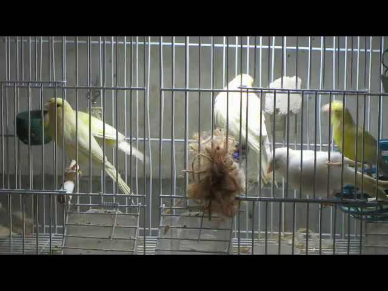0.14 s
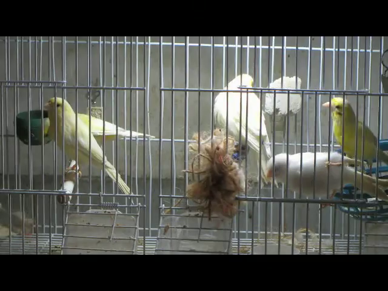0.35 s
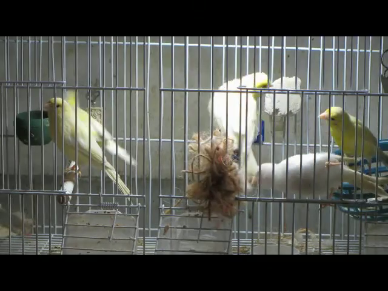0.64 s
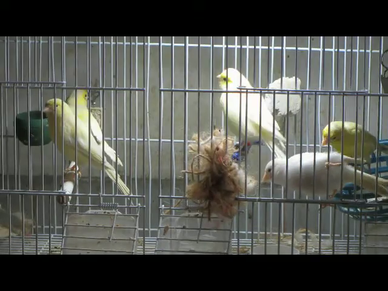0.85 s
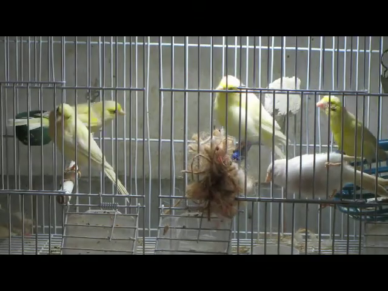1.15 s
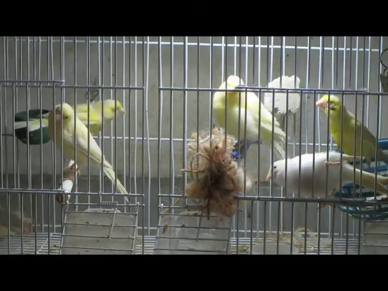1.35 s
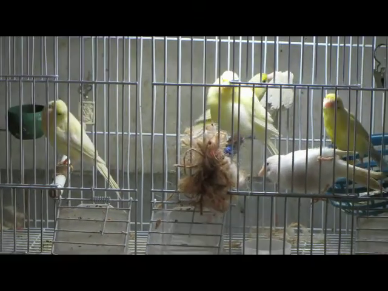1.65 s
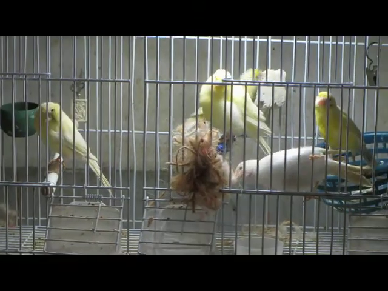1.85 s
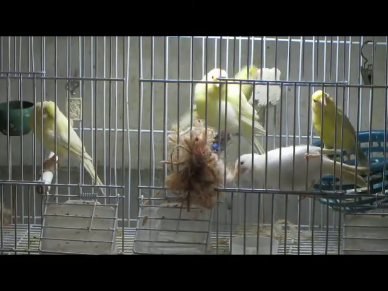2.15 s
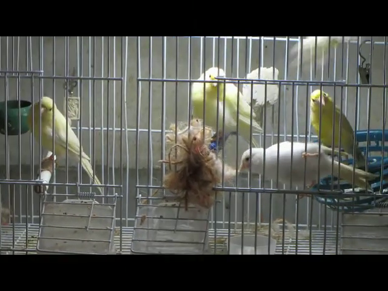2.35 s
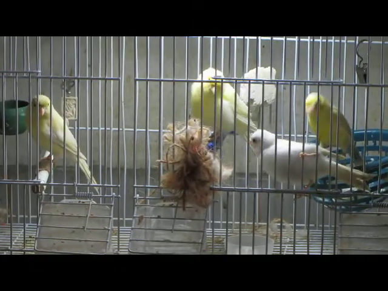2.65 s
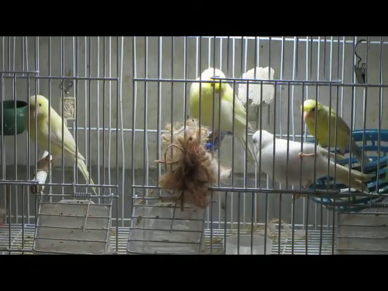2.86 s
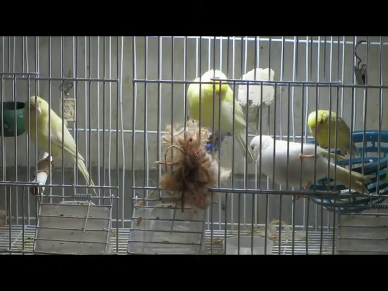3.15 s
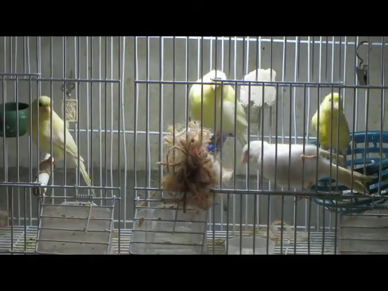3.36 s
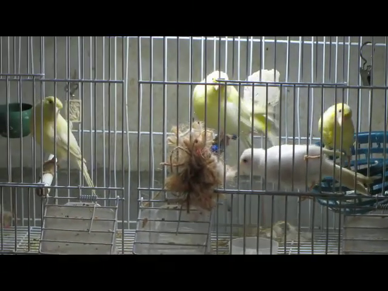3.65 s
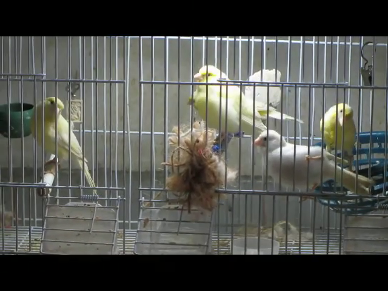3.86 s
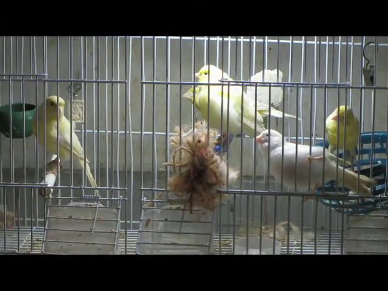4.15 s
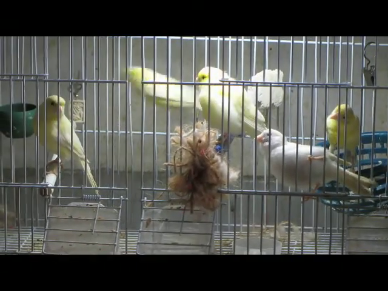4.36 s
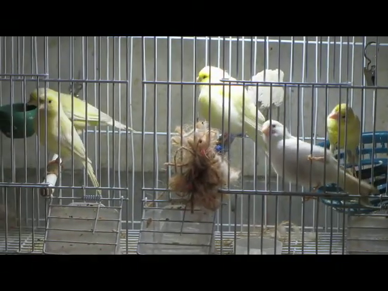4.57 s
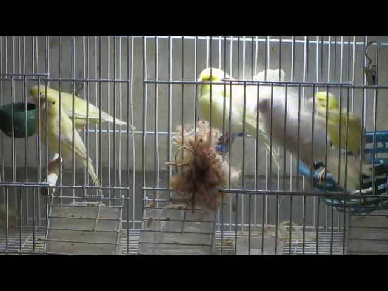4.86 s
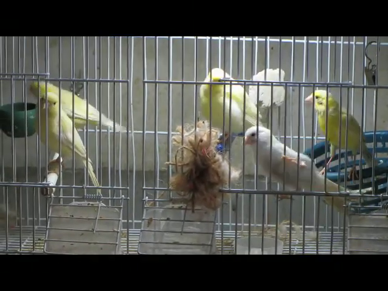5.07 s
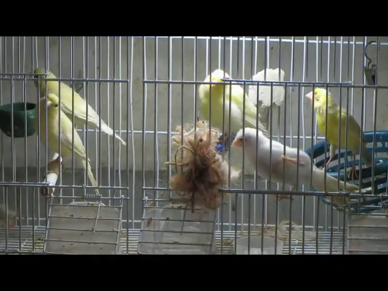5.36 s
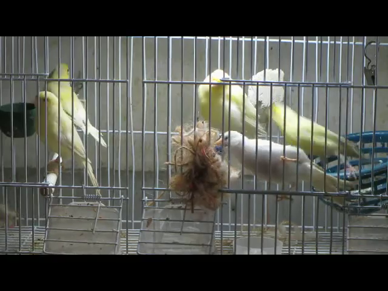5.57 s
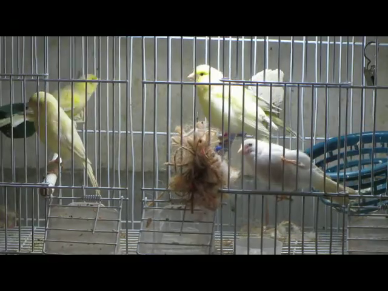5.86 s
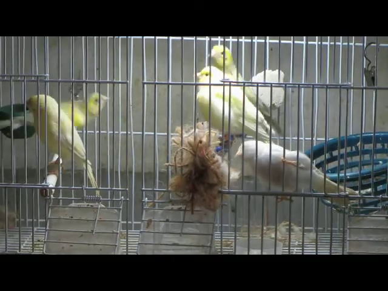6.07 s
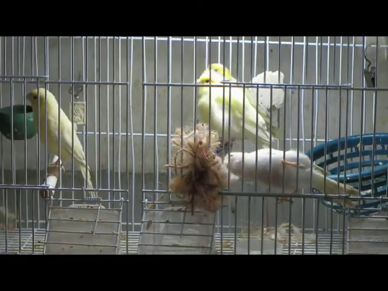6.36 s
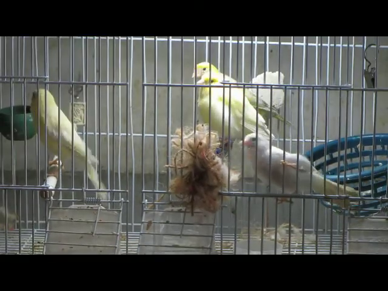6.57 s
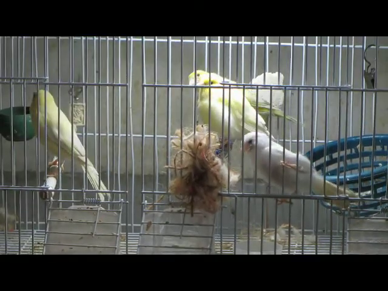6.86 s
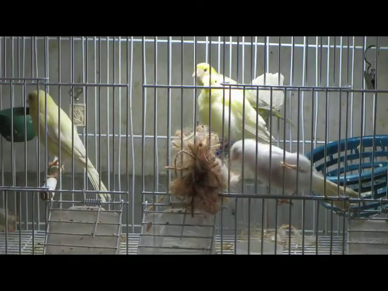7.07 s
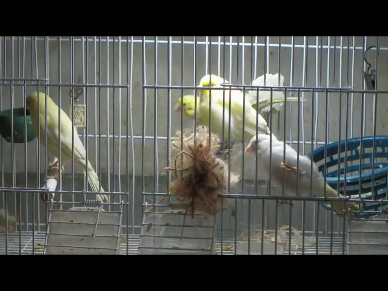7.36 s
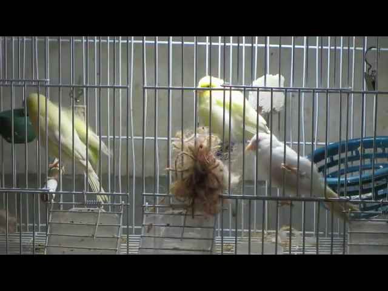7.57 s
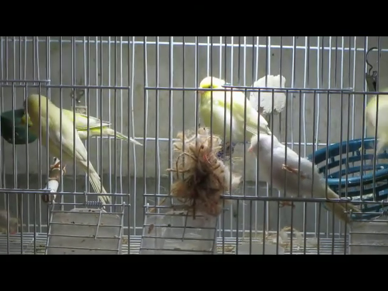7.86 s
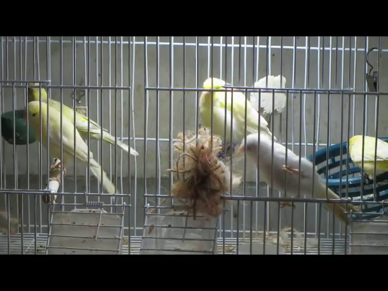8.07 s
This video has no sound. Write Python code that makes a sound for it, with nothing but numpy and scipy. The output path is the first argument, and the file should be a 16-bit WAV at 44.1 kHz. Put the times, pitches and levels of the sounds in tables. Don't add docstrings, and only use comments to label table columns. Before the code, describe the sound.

Several small caged birds chirp in short rising notes with occasional thin whistles, while claws and wings rattle the wire bars in a humming, hissing room.

```python
import sys
import numpy as np
from scipy import signal
from scipy.fft import rfft, irfft, next_fast_len
from scipy.io import wavfile
from scipy.ndimage import uniform_filter1d, map_coordinates

SR = 44100
rng = np.random.default_rng(int(sys.argv[2]) if len(sys.argv) > 2 else 0)


def store_wav(level_fs):
    pcm = np.round(np.clip(np.atleast_2d(level_fs), -1, 1) * 32767)
    wavfile.write(sys.argv[1], SR, pcm.T.astype(np.int16))


def elevation(decibels):
    levels = np.asarray(decibels, float)
    return 10 ** (levels / 20)


N = 362061
TAIL = SR // 4


def along(points, hz):
    f, v = np.transpose(points)
    return np.interp(np.log(hz + 1), np.log(f + 1), v)


def unit(x):
    return x / np.sqrt(np.mean(x ** 2) + 1e-20)


def wobble(rate, size=N):
    knots = rng.standard_normal(int(max(size, TAIL) * rate / SR) + 4)
    return map_coordinates(knots, [np.arange(size) * rate / SR])


def filtered(x, response):
    m = next_fast_len(x.shape[-1] + 2048)
    return irfft(rfft(x, m) * response(np.fft.rfftfreq(m, 1 / SR)), m)[..., :x.shape[-1]]


def panned(pan_db):
    return elevation(np.outer([.5, -.5], pan_db))


def rush(spectrum, patchy_db):
    # frequency in Hz, coherence from 0 to 1.
    likeness = [(60, 0.88), (150, 0.074), (380, 0.1), (950, 0.55), (2380, 0.32), (5980, 0.02),
                (15000, 0.04)]
    # frequency in Hz, left-right level in dB.
    lean = [(60, 2.5), (380, 2.5), (2380, 1), (15000, 6)]
    z = signal.stft(rng.standard_normal((2, N)), nperseg=512)[2]
    field = rng.standard_normal(z.shape[1:])
    field = uniform_filter1d(uniform_filter1d(field, 6, 0), 10, 1)
    pair = signal.istft(z * elevation(patchy_db * unit(field)), nperseg=512)[1][:, :N]

    def mid_side(hz):
        angle = np.arccos(np.clip(along(likeness, hz), -1, 1)) / 2
        return elevation(along(spectrum, hz)) * np.array([np.cos(angle), np.sin(angle)])

    mid, side = filtered(pair, mid_side)
    stereo = np.array([mid + side, mid - side])
    return unit(filtered(stereo, lambda hz: panned(along(lean, hz))))


def echoes():
    # frequency in Hz, decay by 60 dB in seconds.
    walls = [(1000, 0.65), (3000, 0.26), (5000, 0.19), (10000, 0.19), (15000, 0.072)]
    coherence, early_db, early_s, onset_s = 0.34, 6, 0.038, 0.00086
    hz, t, z = signal.stft(rng.standard_normal((2, TAIL)), SR, nperseg=128)
    decay = elevation(-60 * t / along(walls, hz)[:, None])
    a, b = signal.istft(z * decay, SR, nperseg=128)[1][:, :TAIL]
    angle = np.arccos(coherence) / 2
    t = np.arange(TAIL) / SR
    tail = np.cos(angle) * a + np.sin(angle) * np.outer([1, -1], b)
    tail *= elevation(early_db * np.exp(-t / early_s)) * (1 - np.exp(-t / onset_s))
    tail *= elevation(3.7 * wobble(352.3, size=TAIL))
    return tail / np.linalg.norm(tail[0])


PLACES = [echoes() for _ in range(32)]


def add(out, s, sound, pan_db, wet_db):
    place = PLACES[rng.integers(len(PLACES))] * elevation(wet_db)
    place[[0, 1], rng.integers(0, 5, 2)] += 1
    heard = signal.fftconvolve(sound[None], place, axes=1)
    energy = np.linalg.norm(sound) * np.hypot(1, elevation(wet_db))
    heard *= energy / np.linalg.norm(heard, axis=1, keepdims=True)
    part = out[:, round(s * SR):][:, :heard.shape[1]]
    part += heard[:, :part.shape[1]] * panned(pan_db)


def air():
    # time in seconds, room level in dB, rustle level in dB.
    course = [(0.0, -45.5, -55), (1.12, -43.5, -50), (1.69, -45.5, -54.5), (3.45, -44, -49.5),
              (5.12, -45, -52.5), (5.65, -46.5, -51.5), (6.75, -46.5, -58), (8.21, -45.5, -55)]
    # frequency in Hz, density in dB per Hz.
    hum_spectrum = [(12, -50), (20, -19), (43, -9.5), (64, -10.5), (83, -7.5), (103, 3), (141, -6.5),
                    (157, -6), (192, -3.5), (303, -5.5), (445, -17), (559, -21.5), (600, -15), (780, -25),
                    (1320, -120)]
    # frequency in Hz, density in dB per Hz.
    room_spectrum = [(240, -36), (400, -14.5), (567, -5), (922, -8.5), (1080, -5.5), (1290, -10.5),
                     (2410, -11), (3600, -21), (5000, -27.5), (6500, -61), (11000, -120)]
    # frequency in Hz, density in dB per Hz.
    rustle_spectrum = [(2060, -54), (3500, -11), (5750, 2.5), (6170, 1.5), (6650, -1), (9520, -2),
                       (15700, -36.5)]
    # frequency in Hz, density in dB per Hz.
    hiss_spectrum = [(2500, -40), (6000, -6), (10000, 0), (12000, -10), (14000, -15), (15800, -19)]
    s, *levels = np.transpose(course)
    room_db, rustle_db = [np.interp(np.arange(N) / SR, s, db) for db in levels]
    hum = elevation(-44.5) * rush(hum_spectrum, patchy_db=1.27)
    room = elevation(room_db + 1.49 + 0.29 * wobble(7.1)) * rush(room_spectrum, patchy_db=2.0)
    hiss = elevation(-66) * rush(hiss_spectrum, patchy_db=.5)
    starts = (rng.random(N) < 16 / SR) * rng.exponential(size=N)
    stir = 1 + 0.78 * signal.lfilter([1], [1, -np.exp(-1 / (.03 * SR))], starts)
    rustle = elevation(rustle_db - .7) * stir * rush(rustle_spectrum, patchy_db=2.5)
    return hum + room + hiss + rustle


def bars():
    # start in seconds, peak level in dB, low knock in dB.
    strikes = [(0.164, -41.5, -5), (0.2717, -31, -7), (0.4544, -43, -17), (0.707, -38, -4), (.744, -42, -8),
               (.797, -41, -8), (0.82, -33.5, -3), (.884, -40, -8), (0.981, -35, -6), (1.079, -44, -9),
               (1.5707, -39.5, -3), (2.5784, -37, 0), (2.67, -44, 3), (2.864, -32, -13), (3.2178, -32, -16),
               (3.938, -34, -1.5), (4.4533, -35, -4), (4.6066, -31.5, -2), (4.6477, -35.5, -5),
               (4.702, -40, -10), (4.803, -36, -12), (4.8205, -23.5, -9), (4.912, -25, -5),
               (4.9685, -22, -8.5), (5.952, -30, -6.5), (6.1, -38, 6), (6.728, -40, -8), (7.044, -42, -10),
               (7.1577, -42, 1.5), (7.425, -43, -10), (7.9154, -34, -11)]
    # frequency in Hz, density in dB per Hz.
    wire = [(1180, -22), (2000, -21), (2280, -1), (4310, -11.5), (4950, -6), (5170, -6.5), (8680, -10.5),
            (15700, -39)]
    # frequency in Hz, width in Hz, level in dB.
    tray_modes = [(980, 137, 0.5), (1870, 440, -3.5), (2180, 360, -9)]
    out, t = np.zeros((2, N)), np.arange(SR // 16) / SR

    def tray(f):
        total = 0
        for k, (centre, width, db) in enumerate(tray_modes):
            damping = 1j * f * width
            total = total + (-1) ** k * elevation(db) * damping / (centre * centre - f * f + damping)
        return total

    burst = elevation(-60 * t / 0.04) * (1 - np.exp(-t / 0.0004))
    for s, db, knock_db in strikes:
        shake = rng.standard_normal((2, len(t))) * burst
        rattle = unit(filtered(shake[0], lambda hz: elevation(along(wire, hz))))
        knock = elevation(knock_db + 4.5) * unit(filtered(shake[1], tray))
        add(out, s, elevation(db - 18.0) * (rattle + knock), rng.normal(2.8, 2.3), wet_db=6.0)
    return out


def tray_knocks():
    # start in seconds, pitch in Hz, level in dB, decay by 60 dB in seconds.
    knocks = [
        (.76, 1020, -39, .06),
        (3.955, 1010, -38, .07),
        (4.19, 1020, -39, .05),
        (7.424, 980, -30, .12),
    ]
    out, t = np.zeros((2, N)), np.arange(SR // 8) / SR
    for s, hz, db, t60 in knocks:
        ring = elevation(db - 60 * t / t60) * (1 - np.exp(-t / .003))
        add(out, s, ring * np.sin(2 * np.pi * hz * t), pan_db=2.5, wet_db=-12.0)
    return out


def voice(pitch_hz, bright_db, rough_db):
    # multiple of the pitch, level in dB.
    overtones = [(2, -18.5), (3, -22), (4, -33)]
    # frequency in Hz, gain in dB.
    throat = [(4000, -9), (7000, 1), (8500, 6), (10000, 3.5), (11500, -1.5), (13000, -17), (16000, -18)]
    size = len(pitch_hz)
    phase = 2 * np.pi * np.cumsum(pitch_hz) / SR
    tone = np.sin(phase)
    for k, db in overtones:
        level_db = db + bright_db + 3.6 * wobble(65, size) + along(throat, k * pitch_hz)
        tone = tone + elevation(level_db) * np.sin(k * phase)
    return elevation(rough_db * wobble(897, size)) * tone


def swell(u, rise, fall):
    return np.sin(np.pi / 2 * np.clip(u / rise, 0, 1)) * np.sin(np.pi / 2 * np.clip((1 - u) / fall, 0, 1))


def hold(out, s, hz, db, pan_db):
    pitch = hz * (1 + 0.0025 * wobble(44.2, size=len(hz)))
    envelope = elevation(db + 2.9) * swell(np.linspace(0, 1, len(hz)), 0.006, 0.03)
    add(out, s, envelope * voice(pitch, -35, 0.19), pan_db, wet_db=-13.0)


def thin_whistles():
    # time in seconds, level in dB.
    courses = [
        [(0.176, -46), (0.188, -37), (0.21, -43), (0.24, -28), (0.284, -25), (0.32, -35), (0.335, -45)],
        [(4.694, -43), (4.706, -32), (4.73, -41), (4.764, -27), (4.804, -25), (4.846, -39), (4.86, -49)],
    ]
    start_hz, sag_hz_per_s = 4910, 564
    out = np.zeros((2, N))
    for rows in courses:
        s, db = np.transpose(rows)
        t = np.arange(0, s[-1] - s[0], 1 / SR)
        hold(out, s[0], start_hz - sag_hz_per_s * t, np.interp(t + s[0], s, db) + 1.5, 4.6)
    return out


def long_whistles():
    # time in seconds, level in dB.
    courses = [
        [(0.418, -29), (0.424, -22), (0.438, -27), (0.582, -21), (0.608, -24), (0.616, -32), (0.656, -18),
         (0.694, -21), (0.74, -36)],
        [(4.938, -30), (4.942, -25), (5.08, -24), (5.092, -19), (5.128, -25), (5.136, -34), (5.178, -18),
         (5.22, -23), (5.26, -38)],
    ]
    settle_hz, scoop_hz, scoop_s, climb_hz_per_s = 2967, 450, .024, 500
    out = np.zeros((2, N))
    for rows in courses:
        s, db = np.transpose(rows)
        t = np.arange(0, s[-1] - s[0], 1 / SR)
        pitch = settle_hz - scoop_hz * np.exp(-t / scoop_s) + climb_hz_per_s * t
        beating_db = 7 * np.exp(-t / 0.11) * np.sin(2 * np.pi * 62 * t * (1 - 2.2 * t))
        hold(out, s[0], pitch, np.interp(t + s[0], s, db) + beating_db, 1.2)
    return out


def duets():
    # start in seconds, length in ms, high voice in Hz, level in dB,
    # low voice in dB.
    calls = [(1.595, 28, 6516, -18, 0), (1.92, 33, 6380, -27.5, 0), (4.254, 15.3, 6540, -23.5, -10),
             (5.298, 25.7, 6620, -17, -2), (5.411, 30, 6540, -26, 0), (6.081, 30.5, 6370, -16.5, 0),
             (7.955, 26, 6570, -24, -2)]
    # multiple of the low, multiple of the high, level in dB.
    mixing = [(1, 0, -2), (0, 1, 2.5), (-1, 2, -19), (2, -1, -33), (-2, 3, -27), (2, 0, -20.5), (1, 1, -30),
              (0, 2, -30), (-1, 3, -41)]
    low_base_hz, low_follows = 3320, .3
    out = np.zeros((2, N))
    for s, ms, high_hz, db, low_db in calls:
        low_hz = low_base_hz + low_follows * high_hz
        u = np.linspace(0, 1, int(ms * SR / 1000))
        turns = 2 * np.pi * np.cumsum(1 + 0.05 * (1 - u) ** 2.93) / SR
        both = 0
        for j, k, level in mixing:
            both = both + elevation(level + abs(j) * low_db) * np.sin((j * low_hz + k * high_hz) * turns)
        add(out, s, elevation(db) * swell(u, 0.57, 0.53) * both, pan_db=2.5, wet_db=-2.0)
    return out


def slurs():
    # start in seconds, length in ms, start in Hz, end in Hz, level in dB.
    slides = [(.435, 13, 3660, 3730, -43), (.583, 14, 4900, 6940, -35.5), (2.365, 70, 4500, 4150, -33),
              (2.194, 49, 4620, 4170, -35), (2.898, 10.5, 6300, 6850, -25.5), (5.353, 54, 6200, 7430, -44),
              (5.399, 37, 7260, 5400, -34), (5.462, 35, 7140, 5040, -28.5), (5.5, 11, 6400, 7600, -37),
              (5.511, 69, 8050, 5380, -32), (6.501, 14, 5250, 6390, -28.5), (7.048, 18, 6600, 8130, -32)]
    out = np.zeros((2, N))
    for s, ms, start_hz, end_hz, db in slides:
        u = np.linspace(0, 1, int(ms * SR / 1000))
        pitch = end_hz - (end_hz - start_hz) * (1 - u) ** 1.9
        note = elevation(db - 1.0) * swell(u, .3, 0.37) * voice(pitch, -8, 1.4)
        add(out, s, note, pan_db=3.5, wet_db=2.5)
    return out


def chirps():
    # start in seconds, length in ms, top in Hz, level in dB, overtones in dB.
    shrill = [(.342, 21, 4740, -22, -5), (.986, 14.4, 5000, -28, -3), (1.26, 24, 5100, -30, -4),
              (1.502, 6.3, 4600, -34, 0), (1.805, 13.5, 4910, -20, 4), (1.872, 26, 4710, -35.5, 0),
              (2.011, 18.3, 4900, -31, 0), (2.329, 21, 4760, -22, -1), (3.25, 17, 4690, -20, 2),
              (3.482, 11, 5020, -28.5, 0), (4.175, 36, 5570, -24, -3), (4.19, 22.8, 4770, -17, -4),
              (4.436, 5.5, 4470, -34.5, 0), (5.203, 13, 5080, -20, 0), (5.691, 15, 4900, -26.5, 0),
              (5.779, 17.3, 5350, -19.5, -6), (5.819, 22, 5200, -16.5, -3), (6.117, 20, 4970, -16.5, 0),
              (7.773, 17, 4960, -14, -3), (7.839, 30, 4860, -39.5, 0), (8.102, 17, 4940, -32, 4),
              (8.158, 14, 4930, -31, 0)]
    # start in seconds, length in ms, top in Hz, level in dB,
    # overtones in dB.
    sweeping = [(.003, 12.6, 4840, -28.5, 0), (.29, 20, 4860, -27, 0), (2.466, 30, 4900, -24, 3),
                (2.962, 14, 4920, -21.5, 0), (3.084, 24, 5190, -17, 1), (3.363, 32.3, 4450, -20.5, -4),
                (3.56, 26, 4910, -26, -1), (4.467, 27, 4000, -30.5, 0), (4.696, 9.7, 4350, -35, -5),
                (5.946, 30.3, 4540, -18.5, -4), (7.45, 26.7, 4770, -25.5, 5)]
    # start in seconds, length in ms, top in Hz, level in dB, overtones in dB.
    left = [(.082, 15, 3500, -32.5, 0), (1.388, 24.7, 3520, -19, -2), (1.723, 11.6, 3780, -33, 0),
            (2.114, 15, 3360, -41, 0), (2.262, 34, 3484, -21, -2), (2.566, 5.4, 3120, -41, 0),
            (2.846, 24, 3267, -22.5, 0), (2.892, 19, 3370, -21.5, 0), (3.522, 5.9, 3310, -37, 0),
            (5.691, 23.6, 3544, -21.5, -3), (6.01, 18, 3490, -26.5, 0), (6.987, 13, 3200, -33, -3),
            (7.345, 20, 3230, -34, 4)]
    # start in seconds, length in ms, top in Hz, level in dB, overtones in dB.
    middle = [(.206, 13, 3680, -23.5, 0), (.884, 16, 3720, -22.5, -6), (1.119, 17.8, 3200, -25, -4),
              (1.25, 16.5, 3660, -24.5, 0), (1.682, 10, 3140, -39.5, 0), (2.734, 6.2, 3570, -34, 3),
              (2.966, 26, 3450, -24, 0), (3.302, 12, 3430, -31.5, 0), (3.403, 22.6, 3420, -24, -2),
              (3.672, 7.8, 3280, -34.5, 0), (3.841, 19, 3585, -21.5, 4), (5.546, 20, 3260, -23, 0),
              (5.663, 15.3, 3470, -14.5, -8), (6.212, 19.8, 3574, -25, 0)]
    # start in seconds, length in ms, top in Hz, level in dB, overtones in dB.
    right = [(.581, 21, 3770, -35, 0), (1.972, 8.6, 3320, -31.5, 0), (4.269, 26, 3580, -27, 0),
             (4.359, 20, 3550, -22, 3), (7.073, 21, 3230, -29.5, -2), (7.115, 9.9, 3680, -35.5, 0),
             (7.236, 15, 3310, -34, 0)]
    # start in seconds, length in ms, top in Hz, level in dB,
    # overtones in dB.
    steep = [(.859, 8.9, 3640, -34, 0), (1.02, 14, 3780, -33.5, -3), (1.072, 19, 3200, -32, -4),
             (1.531, 13.8, 3320, -35, 0), (2.175, 23.6, 3530, -23.5, -2), (2.462, 9, 3310, -35, 0),
             (3.141, 17.7, 3640, -24, 0), (6.496, 22, 3140, -33.5, 0), (7.797, 17, 3700, -40, 0),
             (7.927, 14.4, 3700, -32, 0), (8.164, 7.8, 3250, -38.5, 0)]
    # start in seconds, length in ms, top in Hz, level in dB,
    # overtones in dB.
    hooks = [
        (6.996, 15, 4370, -36, -3),
        (7.044, 22, 4210, -31.5, 0),
    ]
    # start in seconds, length in ms, top in Hz, level in dB,
    # overtones in dB.
    scoops = [(2.592, 21.5, 3464, -18.5, -5), (2.823, 13.7, 3560, -21, 0), (4.067, 28.3, 3564, -19, 0),
              (7.279, 17, 3263, -22, 0), (7.624, 20.5, 3450, -20.5, -2)]
    # start in seconds, length in ms, top in Hz, level in dB, overtones in dB.
    peeps = [(.403, 5.6, 3760, -36, 0), (1.151, 9.7, 3520, -29, 0), (2.178, 20, 4590, -33, 0),
             (2.401, 26, 4236, -30.5, 0), (2.441, 28, 4920, -29.5, 2), (3.833, 9, 3600, -39, 0),
             (3.928, 11.7, 3270, -18.5, -6), (4.477, 12, 4670, -32, 0), (4.92, 17, 3765, -35, 0),
             (6.392, 17, 4380, -40, 0), (6.439, 29, 4880, -32, 0), (7.329, 20.4, 3560, -27, 4)]
    # start in seconds, length in ms, top in Hz, level in dB,
    # overtones in dB.
    mutters = [(.289, 11, 2720, -37, 0), (.379, 15, 2010, -41.5, 0), (1.217, 20.7, 2260, -44, 0),
               (4.041, 16, 2800, -36.5, 5), (4.901, 10.8, 1963, -39, 0), (5.357, 14, 2910, -41.5, 0)]
    # start in seconds, length in ms, top in Hz, level in dB, overtones in dB.
    drawn = [
        (.037, 84, 3162, -24, -5),
        (2.052, 74, 3500, -33.5, 0),
        (4.416, 72, 3203, -26.5, 0),
        (4.563, 71, 3138, -26, 0),
    ]
    # bend of the glide, share of the note spent swelling, roughness dB, echoes dB, overtones dB
    plain, harsh, held = (2, 0.63, .7, 2, -1), (1.72, 0.5, 2.5, 4.5, -2), (4.5, 0.2, 2, 9.5, -19.5)
    clear, scooped = (3.4, .55, .5, .1, -2.5), (3, .6, .5, .1, -2.5)
    # calls, kind, start Hz, left-right dB
    callers = [(shrill, harsh, 3120, 3.1), (sweeping, harsh, 2780, 3.1), (left, clear, 2870, 6.2),
               (middle, plain, 2760, 2.4), (right, plain, 2780, -0.92), (steep, plain, 2590, 2.3),
               (hooks, clear, 3000, 3.5), (scoops, scooped, 2600, 5.5)]
    # calls, kind, start over top, left-right dB
    sliders = [(peeps, plain, .93, 4.2), (mutters, plain, .79, -1.1), (drawn, held, .86, -1.2)]
    notes = [(kind, hz, pan, *row) for calls, kind, hz, pan in callers for row in calls]
    notes += [(kind, share * row[2], pan, *row) for calls, kind, share, pan in sliders for row in calls]
    out = np.zeros((2, N))
    for kind, start_hz, pan_db, s, ms, end_hz, db, beak_db in notes:
        bend, rise, rough_db, wet_db, bright_db = kind
        u = np.linspace(0, 1, int((ms + 4) * SR / 1000))
        pitch = end_hz - 1.17 * (end_hz - start_hz) * (1 - u) ** bend
        note = swell(u, rise, 0.45) ** 0.76 * voice(pitch, bright_db + beak_db + 1.2, rough_db)
        note *= elevation(db - wet_db + 5.4)
        add(out, max(s - .004, 0), note, pan_db + rng.normal(0, 0.39), wet_db)
    return out


def scene():
    return air() + bars() + tray_knocks() + thin_whistles() + long_whistles() + duets() + slurs() + chirps()


def band_limit(x):
    return signal.sosfilt(signal.butter(12, 15890, fs=SR, output="sos"), x)


def record(dry):
    # frequency in Hz, left-right level in dB.
    ports = [(1000, 0.1), (3500, -1.95), (9500, 6.5), (13000, 0.5)]
    top_hz = 15830
    mix = filtered(dry, lambda hz: (hz < top_hz) * panned(along(ports, hz)))
    return band_limit(mix)


dry = scene()
out = record(dry)
store_wav(out)
```